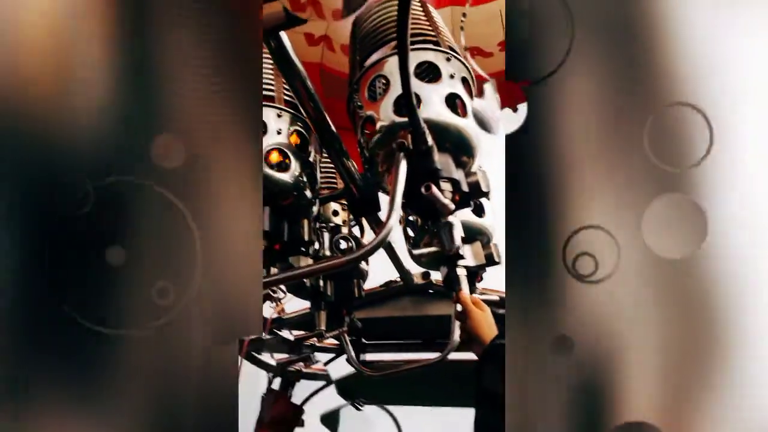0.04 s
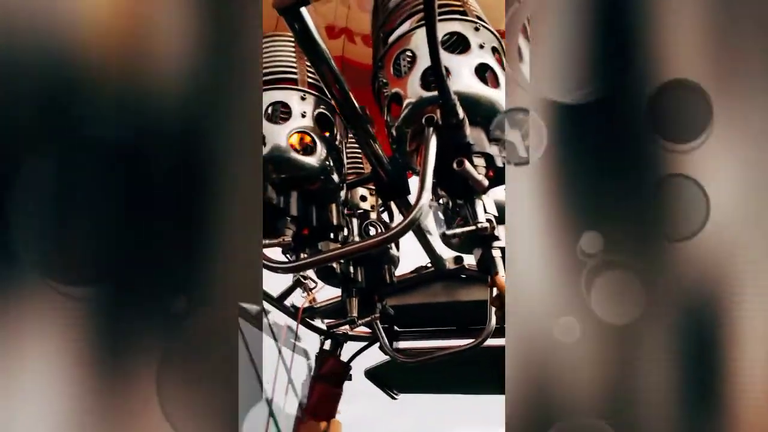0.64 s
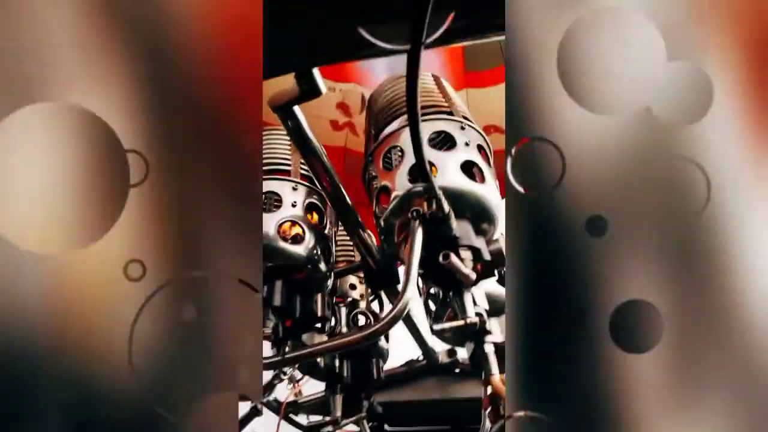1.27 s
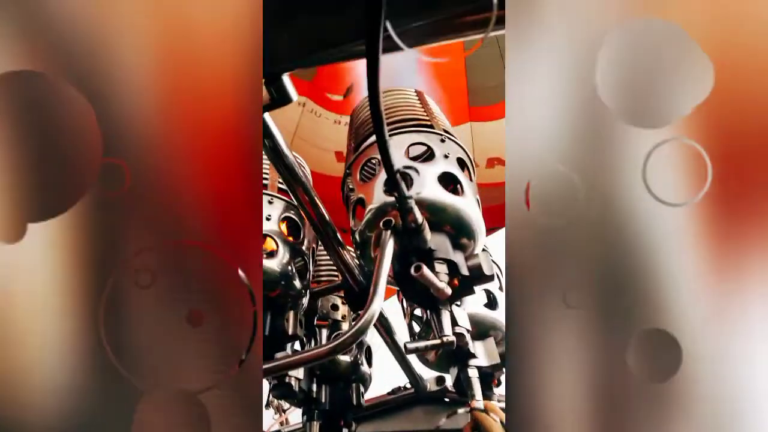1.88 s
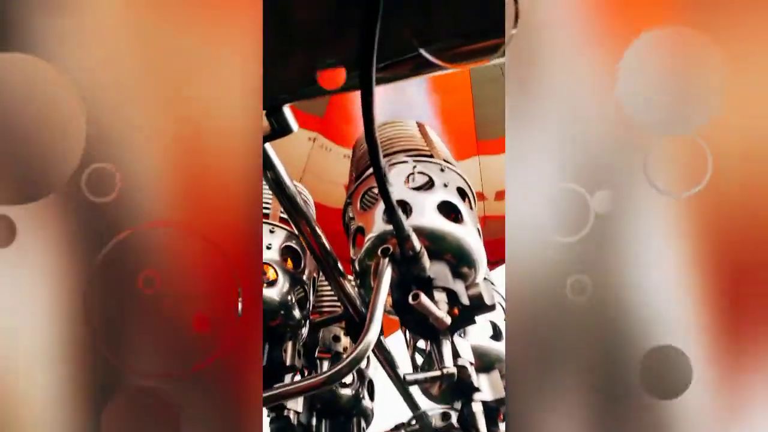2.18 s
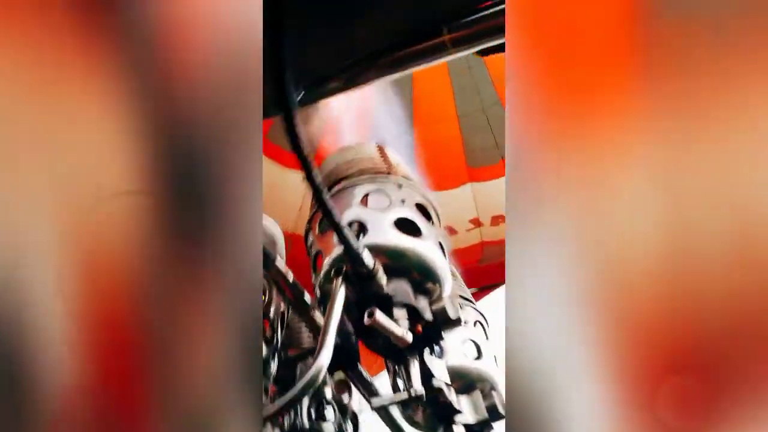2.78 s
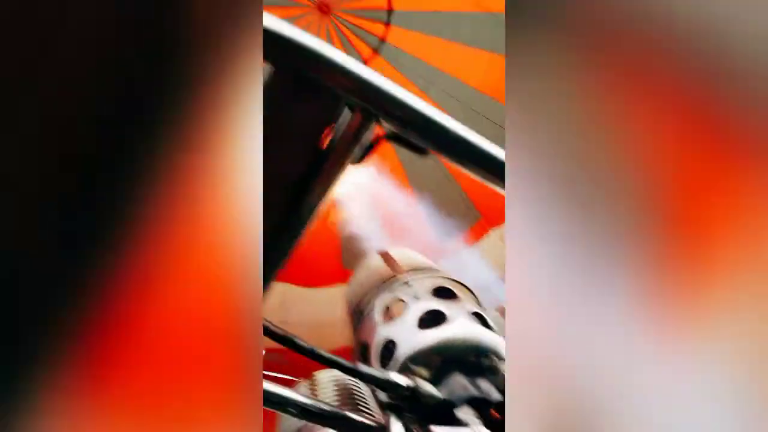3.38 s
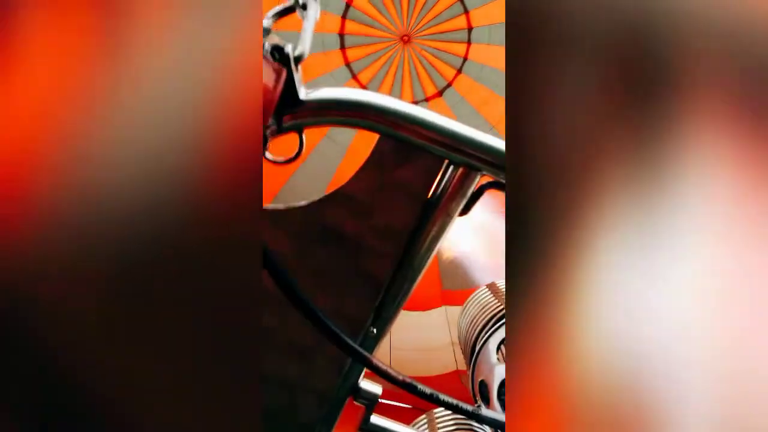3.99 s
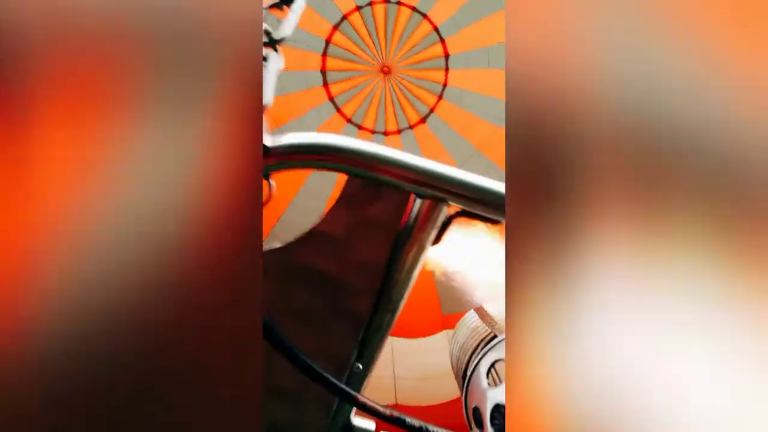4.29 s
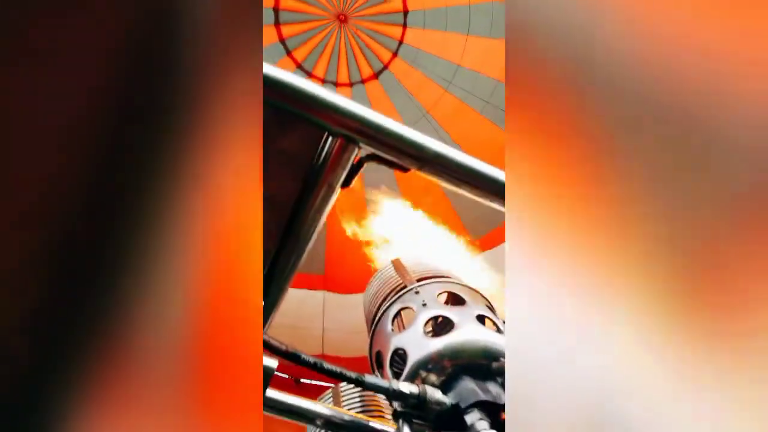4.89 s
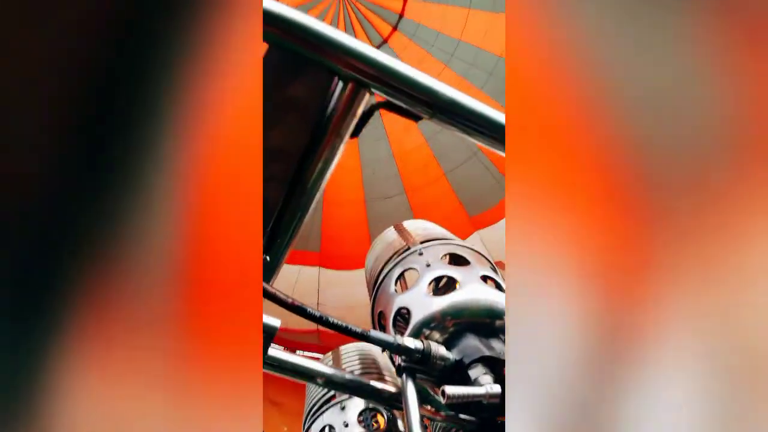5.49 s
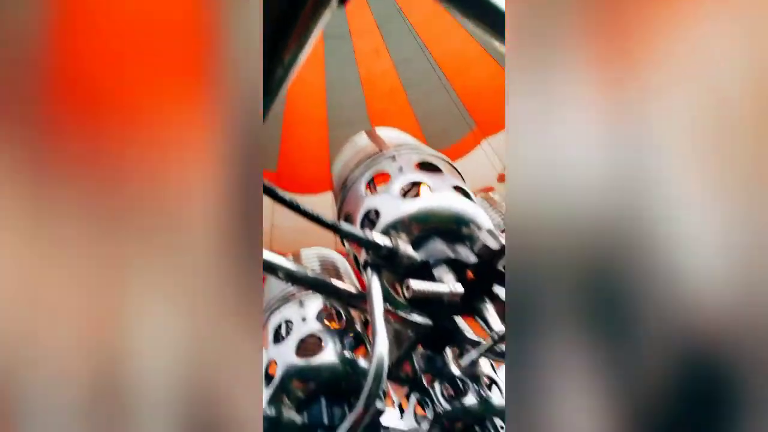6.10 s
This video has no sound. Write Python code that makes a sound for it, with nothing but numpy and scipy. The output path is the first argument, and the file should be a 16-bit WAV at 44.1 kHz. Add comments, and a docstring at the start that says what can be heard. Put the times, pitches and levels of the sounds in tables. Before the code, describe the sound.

From the start, a propane burner is firing loudly just overhead in an open balloon basket: a deep, fluttering flame roar with a bright hiss of gas jets. Its hollow, slightly metallic colour shifts as the hand-held stereo microphone moves from beside the steel burner to under the flame, turning throatier with a sharper hiss around 3 seconds. At about 4.4 seconds the valve starts closing and the blast dips, then a last short puff with a high whistle comes at 4.7 seconds. The flame dies away by about 5.1 seconds. Leftover gas continues as a much quieter, high hiss that builds slightly, with tiny sputters and faint wavering tones. From 5.6 seconds thin rising squeaks join in. Underneath lies the low rush of pilot flames and open air, with one soft rustle near 5.9 seconds, just before the end.

```python
"""In an open balloon basket, a hand-held stereo microphone a short way below the propane burner.
The flame roars and the gas jets hiss; the burner's steel can and frame colour them as the microphone
swings from beside the can to under the flame. The valve closes in two steps, a long blast and a last
whistling puff. The flame dies and the gas still in the coil hisses, sings and sputters, over the low
rush of pilot flames and open air and one soft rustle in the basket."""
import sys
import numpy as np
from scipy import signal
from scipy.fft import rfft, irfft
from scipy.io import wavfile
from scipy.ndimage import uniform_filter1d

SR = 44100
rng = np.random.default_rng(int(sys.argv[2]) if len(sys.argv) > 2 else 0)


def dump_mix(stems):
    """Bounce the given channels to the path in sys.argv[1] as a 16-bit WAV at rate SR."""
    frames = np.atleast_2d(stems).T  # one column per channel
    limited = np.clip(frames, -1, 1)  # hard clip at full scale
    pcm = np.round(limited * 32767).astype(np.int16)
    wavfile.write(sys.argv[1], SR, pcm)


N = 275360
TIME = np.arange(N) / SR
FRAME, HOP = 1024, 256
HZ = np.fft.rfftfreq(FRAME, 1 / SR)
FRAME_S = np.arange(N // HOP + 5) * HOP / SR


def amp(db):
    return 10 ** (np.asarray(db) / 20)


def unit(x):
    return x / np.sqrt(np.mean(x ** 2) + 1e-20)


def ramp(t, start_s, end_s):
    """Goes from 0 to 1 between two moments."""
    return np.clip((t - start_s) / (end_s - start_s), 0, 1)


def gate(start_s, end_s, fade_s):
    """Fades in after one moment and out before another."""
    return np.clip(np.minimum(TIME - start_s, end_s - TIME) / fade_s, 0, 1)


def lagging(gain, lag_s):
    """Follows a gain with inertia."""
    keep = np.exp(-1 / (lag_s * SR))
    return gain[0] + signal.lfilter([1 - keep], [1, -keep], gain - gain[0])


def spectrum(points):
    """Joins (freq_hz, value) points on a log axis, one value a bin."""
    hz, value = np.transpose(points)
    return np.interp(np.log(HZ + 1), np.log(hz), value)


def curves(rows, t):
    """Every value column of a timed table at the times t."""
    time_s, *columns = np.transpose(rows)
    return [np.interp(t, time_s, column) for column in columns]


def bell(hz, width_hz, freqs=HZ):
    """The shape of one resonance, height 1."""
    return 1 / (1 + (2 * (freqs - hz) / width_hz) ** 2)


def eddies(low_hz, high_hz):
    """Random wavering of rms 1 between two rates."""
    f = np.fft.rfftfreq(N, 1 / SR)
    shape = f / (f + low_hz) / (1 + (f / high_hz) ** 2)
    return unit(irfft(rfft(rng.standard_normal(N)) * shape, N))


def singing(hz, width_hz):
    """A fuzzy stereo tone: noise in one narrow resonance."""
    resonance = bell(hz, width_hz, np.fft.rfftfreq(N, 1 / SR))
    return unit(irfft(rfft(rng.standard_normal((2, N))) * resonance, N))


def turbulence(colour_db, coherence, balance_db=0, lag_samples=0):
    """Noise of rms 1 at the two capsules; colour_db sets only the shape of its spectrum."""
    a, b, c, d = rng.standard_normal((4, len(FRAME_S), len(HZ)))
    left, unrelated = a + 1j * b, c + 1j * d
    shape = amp(colour_db) * np.ones_like(a)
    shape /= np.linalg.norm(shape, axis=1, keepdims=True)
    shared = np.clip(spectrum(coherence), 0, 1)
    lead = np.exp(2j * np.pi * HZ * lag_samples / SR)
    right = shared * left * lead + np.sqrt(1 - shared ** 2) * unrelated
    frames = np.array([left * amp(balance_db / 2), right * amp(-balance_db / 2)]) * shape
    _, noise = signal.istft(frames.transpose(0, 2, 1), nperseg=FRAME, noverlap=FRAME - HOP)
    return unit(noise[:, :N])


# Colour of the background in the basket: freq_hz, relative_db
AIR_COLOUR = [(20, -30), (50, -11), (85, 12), (120, 7.5), (175, 9.5), (320, 2), (650, -3.5), (1030, -12),
              (1300, -8), (1550, -10), (2500, -14), (5000, -13), (15000, -33)]
# How alike it is at the two capsules: freq_hz, coherence (0-1)
AIR_COHERENCE = [(80, 1), (300, .92), (650, 0.55), (1200, 0), (4000, 0)]
def air(level_db=-51, flutter_db=1.5):
    """The low rush of the pilot flames overhead and the open air, bared once the blast is gone."""
    rush = turbulence(spectrum(AIR_COLOUR), AIR_COHERENCE)
    return rush * amp(level_db + flutter_db * eddies(2.1, 17))


# Colour of the nearby rustle: freq_hz, relative_db
RUSTLE_COLOUR = [(200, -10), (500, 0), (1100, 3), (1600, -3), (3000, 0), (8000, -29)]
def rustle(level_db=-55, start_s=5.73, end_s=6.08, fade_s=0.027, ragged_db=1.0):
    """A soft, uneven rustle passes in the basket."""
    noise = turbulence(spectrum(RUSTLE_COLOUR), AIR_COHERENCE)
    return noise * gate(start_s, end_s, fade_s) * amp(level_db + ragged_db * eddies(8, 60))


# Faint tones after the blast: start_s, end_s, pitch_hz, wander_hz, level_db
AFTER_TONES = [(5.19, 5.56, 1812, 12, -66.5), (5.62, 6.35, 1822, 34, -67.5), (5.58, 6.35, 646, 2, -66)]
def after_tones(fade_s=0.11, waver_db=2):
    """The weak flow keeps narrow resonances singing, a little unsteady in pitch and strength."""
    out = np.zeros(N)
    for start_s, end_s, pitch_hz, wander_hz, level_db in AFTER_TONES:
        hz = pitch_hz + wander_hz * eddies(11.8, 70)
        tone = unit(np.sin(2 * np.pi * np.cumsum(hz) / SR))
        out += tone * amp(level_db + waver_db * eddies(8, 30)) * gate(start_s, end_s, fade_s)
    return out


# Squeaks after the blast: start_s, length_s, from_hz, to_hz, level_db
SQUEAKS = [(5.56, .055, 3230, 3440, -59), (5.795, .085, 2560, 2890, -60.5), (5.875, .06, 2900, 3380, -54.5),
           (6.055, .07, 3080, 3110, -59), (6.1, .07, 2640, 2850, -60.5), (6.155, .07, 2880, 3400, -56)]
def squeaks():
    """Faint, thin whistles glide upward in the hiss."""
    out = np.zeros(N)
    wobble = 1 + 0.004 * eddies(30, 200)
    for start_s, length_s, from_hz, to_hz, level_db in SQUEAKS:
        progress = ramp(TIME, start_s, start_s + length_s)
        hz = (from_hz + (to_hz - from_hz) * progress) * wobble
        out += amp(level_db) * np.sin(np.pi * progress) * np.sin(2 * np.pi * np.cumsum(hz) / SR)
    return out


# How alike escaping gas is at the two capsules: freq_hz, coherence (0-1)
GAS_COHERENCE = [(1000, 0.2), (2300, 0.43), (5000, 0.073), (9000, 0.057), (15000, 0.099)]
# Colour of the high fizz at the nozzles: freq_hz, relative_db
FIZZ_COLOUR = [(4000, -34), (7000, -1.5), (8200, -3), (10000, -1), (13000, -0.5), (15500, 0.5)]
# Spurts of fuel overhead: start_s, level_db
SPURTS = [(5.108, -59), (5.233, -59), (5.343, -58), (5.618, -60), (5.735, -55), (5.841, -52), (5.937, -49),
          (6.05, -49), (6.164, -48.5)]
def sputter(attack_s=0.016, decay_s=0.016):
    """The last of the fuel spits out in short, soft spurts."""
    puffs = np.zeros(N)
    for start_s, level_db in SPURTS:
        peak_s = start_s + attack_s
        decay = np.exp(-np.maximum(TIME - peak_s, 0) / decay_s)
        puffs += amp(level_db) * ramp(TIME, start_s, peak_s) * decay
    return turbulence(spectrum(FIZZ_COLOUR), GAS_COHERENCE) * puffs


# Resonances of the steel burner can: pitch_hz, width_hz, jet_lift_db, leak_lift_db
CAN_MODES = [(1890, 150, 10, 0), (2080, 110, -10, 2), (2430, 250, 5.5, 1), (2820, 110, -3, -1),
             (3040, 190, -0.5, 2), (3270, 300, -2.5, -2.5), (3930, 190, -7, 3), (4330, 200, -6, -2),
             (5010, 150, -8, 1), (6000, 600, -5, 0), (6800, 400, -10, 0)]
# Colour of the emptying coil's hiss: freq_hz, relative_db
LEAK_COLOUR = [(1000, -24), (2500, -20), (3500, -14.5), (4000, -8), (4500, -7), (4950, -2), (5420, -0.5),
               (5800, -9), (6700, -11), (7600, -18.5), (9500, -28), (11500, -31), (15500, -26)]
# Where it sits in the stereo image: freq_hz, left_minus_right_db
LEAK_BALANCE = [(2000, 5), (3300, 4), (4300, -1.5), (6600, -5.5), (10000, -0.5)]
def leak(full_db=-41.0, growth_db=8.5, flutter_db=0.8):
    """Gas left in the hot coil hisses softly through the can, building up and then holding."""
    ring_db = sum(lift * bell(hz, width) for hz, width, _, lift in CAN_MODES)
    growth = ramp(TIME, start_s=5.18, end_s=5.8)
    hiss_db = full_db - growth_db * (1 - growth) + flutter_db * eddies(4, 25)
    hiss = turbulence(spectrum(LEAK_COLOUR) + ring_db, GAS_COHERENCE, spectrum(LEAK_BALANCE))
    return hiss * amp(hiss_db) * ramp(TIME, start_s=4.94, end_s=5.0)


# The long blast and the last puff: open_s, closing_from_s, flow_db, closing_db_per_s2
VALVE_OPENINGS = [(0, 4.398, 0, 151), (4.74, 4.762, -4, 323)]
def flow_db(opening_db_per_s=117.5):
    """Gas flow: each opening rises quickly, holds, and falls ever faster as the valve closes."""
    power = np.zeros(N)
    for open_s, closing_from_s, held_db, closing_db_per_s2 in VALVE_OPENINGS:
        opening_db = opening_db_per_s * np.maximum(open_s - TIME, 0)
        closing_db = closing_db_per_s2 * np.maximum(TIME - closing_from_s, 0) ** 2
        power += amp(held_db - opening_db - closing_db) ** 2
    return 10 * np.log10(power + 1e-20)


# Whistles of the valve overhead: pitch_hz, width_hz, full_flow_db
VALVE_WHISTLES = [(5045, 110, -36), (5175, 100, -39), (6385, 110, -38)]
def valve_whistles(flow_power=1.4):
    """The half-closed valve whistles through the last puff and dies with the flow."""
    tones = sum(amp(db) * singing(hz, width) for hz, width, db in VALVE_WHISTLES)
    return tones * amp(flow_power * flow_db()) * ramp(TIME, start_s=4.44, end_s=4.53)


# Delay of the left capsule behind the right as the microphone turns: time_s, lag_samples
CAPSULE_LAG = [(0.4, 4.5), (1.4, 1), (2.4, -3), (4.2, -5.4)]
def microphone_path(pass_s=2.71, pass_width_s=1):
    """Frame by frame: how far under the flame (0-1), how near the can (0-1), and the capsule lag."""
    t = FRAME_S[:, None]
    under = ramp(t, start_s=0.27, end_s=4.33)
    near = np.exp(-((t - pass_s) / pass_width_s) ** 2)
    return under, near, curves(CAPSULE_LAG, t)[0]


# The burner along that path at full flow, before each layer's gain: time_s, roar_db, hiss_db, fizz_db
BURNER_LEVELS = [(0.0, -15.5, -26, -30), (0.53, -15.5, -27, -29), (1.97, -15.5, -25.5, -29),
                 (2.43, -15.5, -25.5, -27), (2.93, -15, -27, -29), (3.08, -16.5, -26.5, -29),
                 (3.87, -17.5, -28, -30), (3.96, -14.5, -28.5, -30.5), (4.29, -15.5, -31, -34),
                 (4.4, -17, -30, -34.5)]
# Colour of the jets at close range: freq_hz, relative_db
JET_COLOUR = [(300, -11.5), (1000, 0), (1250, -2), (1600, -2.5), (2200, 0), (2800, 1), (3500, 0.5),
              (4200, 1), (5400, 1), (6700, 2), (7500, -9), (9000, -13), (16000, -38)]
# Where they sit in the stereo image: freq_hz, left_minus_right_db
JET_BALANCE = [(1000, 6.5), (2000, 2), (3000, 2), (4300, 2.5), (5300, 0), (6400, -4.5), (7800, -2.5),
               (10000, 1), (15000, -1)]
def jets(hiss_gain_db=3.0, fizz_gain_db=6.5, hiss_flow_power=0.92, fizz_flow_power=1.3,
         flutter_db=0.54, grain_db=0.5, ripple_db=2.4, beam_db=2.5, blast_ring_share=0.031):
    """Gas tears out of the nozzles in uneven gushes and rings the can."""
    _, near, lag = microphone_path()
    # the can rings more clearly as the jets weaken
    ring_db = sum(lift * bell(hz, width) for hz, width, lift, _ in CAN_MODES)
    weakening = ramp(FRAME_S[:, None], start_s=4.1, end_s=4.6)
    colour_db = spectrum(JET_COLOUR) + (blast_ring_share + (1 - blast_ring_share) * weakening) * ring_db
    # reflections from the steel frame ripple the hiss and drift as the microphone moves
    ripple = uniform_filter1d(rng.standard_normal((len(FRAME_S), len(HZ))), size=70, axis=0)
    colour_db += ripple_db * unit(ripple)
    # the hiss sharpens as the microphone passes the holes in the can
    colour_db += beam_db * near * bell(hz=4770, width_hz=1800)
    _, hiss_db, fizz_db = curves(BURNER_LEVELS, TIME)
    balance_db = spectrum(JET_BALANCE)
    hiss = turbulence(colour_db, GAS_COHERENCE, balance_db, lag)
    hiss *= amp(hiss_db + hiss_gain_db + hiss_flow_power * flow_db())
    fizz = turbulence(spectrum(FIZZ_COLOUR), GAS_COHERENCE, balance_db, lag)
    fizz *= amp(fizz_db + fizz_gain_db + fizz_flow_power * flow_db())
    return (hiss + fizz) * amp(flutter_db * eddies(1.8, 12) + grain_db * eddies(150, 1500))


# Colour of the roar from beside the can and from under the flame: freq_hz, relative_db
ROAR_BESIDE = [(20, -38), (48, -4.5), (75, -33), (110, 4.5), (150, -2.5), (220, 2), (315, -3), (440, -5),
               (540, -8), (720, -7.5), (970, -15.5), (1500, -19.5), (2000, -26), (5000, -39)]
ROAR_UNDER = [(20, -38), (48, -8), (80, -9.5), (110, 4), (155, -2.5), (220, 1.5), (350, -7), (520, -6),
              (630, -11), (760, -8), (920, -26), (1300, -20.5), (2200, -45.5), (5000, -46)]
# Peaks and notches from the burner frame, by microphone position:
# beside_hz, under_hz, near_shift_hz, width_hz, beside_db, under_db, near_extra_db
FRAME_HOLLOWS = [(304, 296, 0, 53, 3.5, -0.5, -2.5), (475, 357, -8, 80, 2.5, 3.5, 1),
                 (540, 503, -10, 84, -5.5, -1, -1), (652, 490, 0, 74, 3.5, 3, 3),
                 (720, 740, -3, 60, 0.5, 3.5, -2), (1103.2, 1020, -55, 80, -11, -16, 9),
                 (1254, 1147, -70, 225, 9, 8, 3), (1516, 1200, -50, 106, 8.5, -1, -3.5),
                 (1730, 1480, -60, 250, -7, 0.5, 2), (2180, 1780, -220, 165, 12.5, 3.5, 3.5)]
def roar_colour(under, near, throat_s=3.06, throat_span_s=0.6, throat_db=6):
    """The frame's peaks and notches mostly sink in pitch as the microphone moves under the flame."""
    colour_db = (1 - under) * spectrum(ROAR_BESIDE) + under * spectrum(ROAR_UNDER)
    for beside_hz, under_hz, shift_hz, width_hz, beside_db, under_db, extra_db in FRAME_HOLLOWS:
        hz = (1 - under) * beside_hz + under * under_hz + near * shift_hz
        lift_db = (1 - under) * beside_db + under * under_db + near * extra_db
        colour_db += lift_db * bell(hz, width_hz)
    # the roar turns throaty for a moment in front of the can
    throat = np.exp(-((FRAME_S[:, None] - throat_s) / throat_span_s) ** 2)
    return colour_db + throat_db * throat * bell(hz=382, width_hz=190)


# How alike the roar is at the two capsules: freq_hz, coherence (0-1)
ROAR_COHERENCE = [(100, 1), (250, 1), (500, 0.92), (750, 0.96), (1300, 0.91), (3000, 0.47)]
# Where it sits in the stereo image: freq_hz, left_minus_right_db
ROAR_BALANCE = [(220, 0), (420, -1), (680, -1.1), (930, 3), (1100, -1.3), (1300, -0.3), (1650, -2),
                (2200, 2)]
def flame(gain_db=-0.06, flutter_db=0.94, echo_s=0.0101, echo_share=0.14,
          flow_power=0.9, burn_s=0.015, linger_db=-25, linger_s=0.26):
    """Burning eddies roar close overhead, following the gas flow a moment late."""
    under, near, lag = microphone_path()
    roar = turbulence(roar_colour(under, near), ROAR_COHERENCE, spectrum(ROAR_BALANCE), lag)
    # the basket floor throws the roar back and makes it hollow
    echo = np.array([np.interp(TIME - echo_s, TIME, channel) for channel in roar])
    # most of the gas burns at once, a little lingers
    fuel = amp(flow_power * flow_db())
    burning = lagging(fuel, burn_s) + amp(linger_db) * lagging(fuel, linger_s)
    roar_db = curves(BURNER_LEVELS, TIME)[0] + gain_db + flutter_db * eddies(1.4, 16)
    return unit(roar + echo_share * echo) * amp(roar_db) * burning


def scene():
    """The blast, the emptying coil and the background, as heard from the basket."""
    blast = flame() + jets() + valve_whistles()
    emptying_coil = leak() + sputter() + after_tones() + squeaks()
    return blast + emptying_coil + air() + rustle()


def record(dry, low_cut_hz=38, band_limit_hz=15520):
    """The microphone sheds the deepest rumble and the recorder the highest treble."""
    low_cut = signal.butter(4, low_cut_hz, btype="highpass", fs=SR, output="sos")
    band_limit = signal.firwin(1023, band_limit_hz, window=("kaiser", 9), fs=SR)
    return signal.oaconvolve(signal.sosfilt(low_cut, dry), band_limit[None], "same")


dry = scene()
out = record(dry)
dump_mix(out)
```